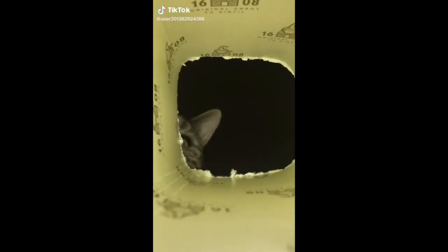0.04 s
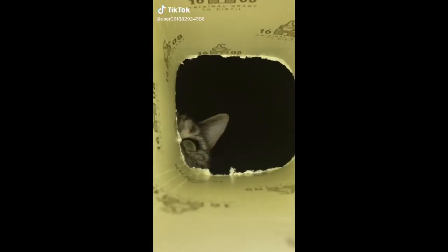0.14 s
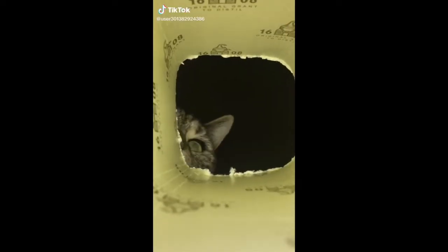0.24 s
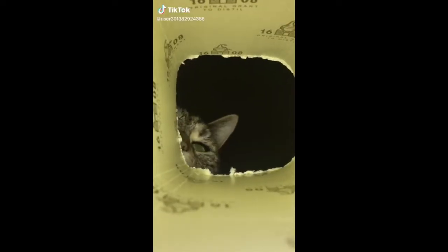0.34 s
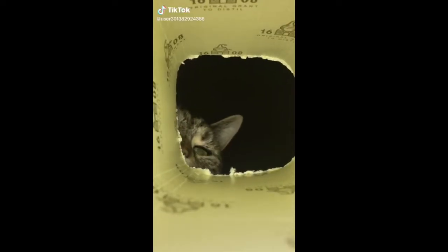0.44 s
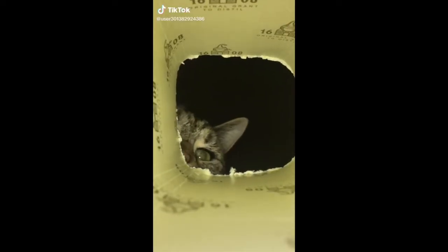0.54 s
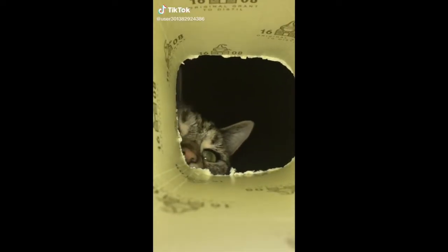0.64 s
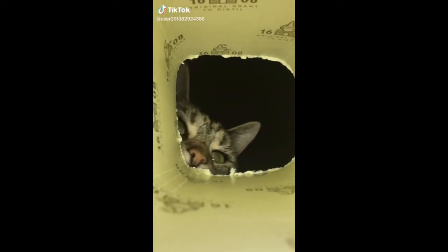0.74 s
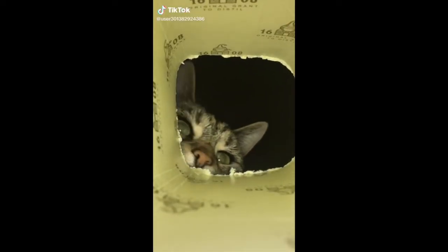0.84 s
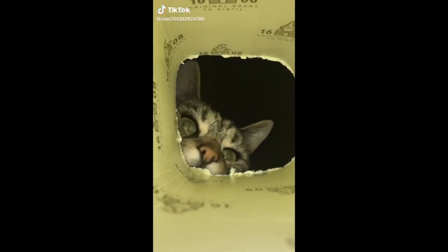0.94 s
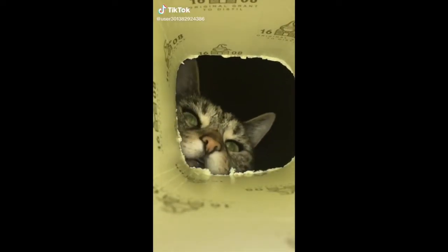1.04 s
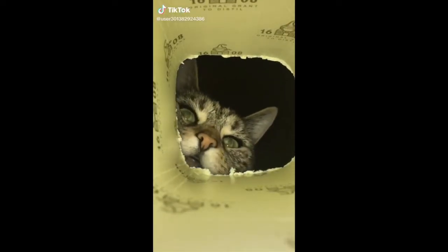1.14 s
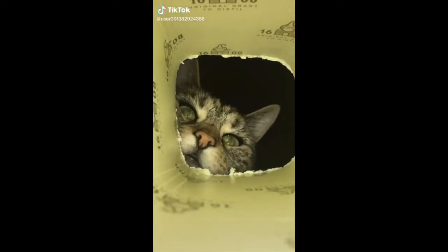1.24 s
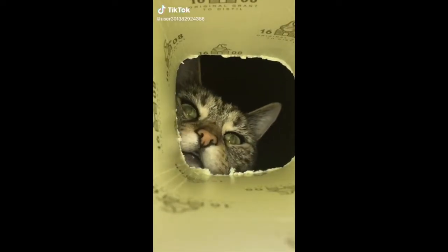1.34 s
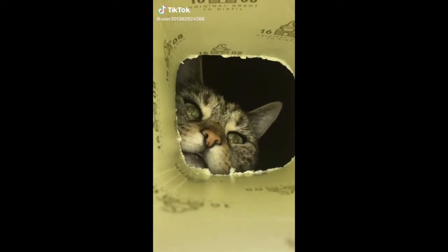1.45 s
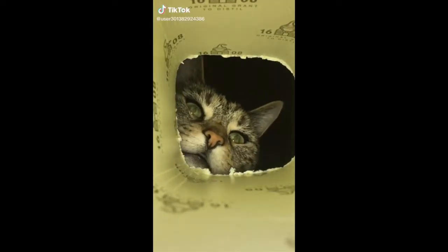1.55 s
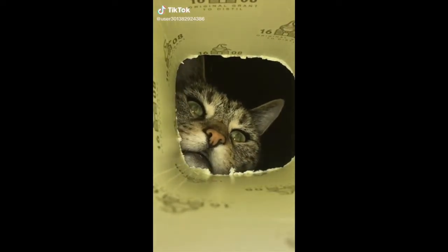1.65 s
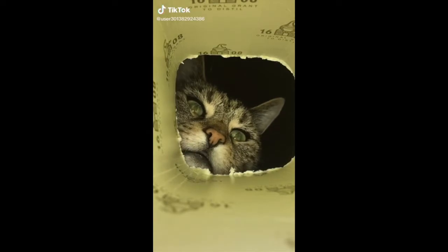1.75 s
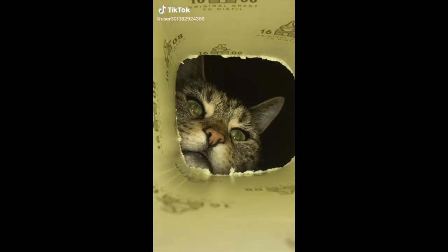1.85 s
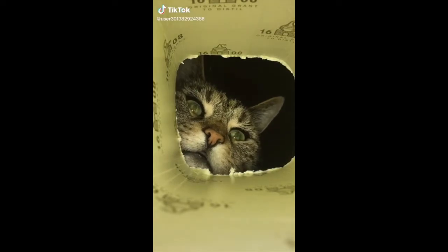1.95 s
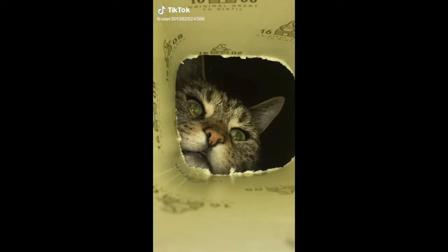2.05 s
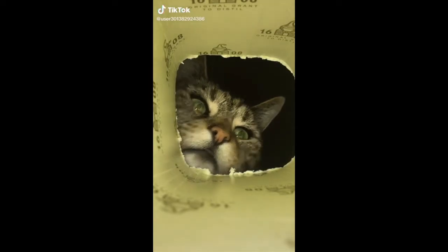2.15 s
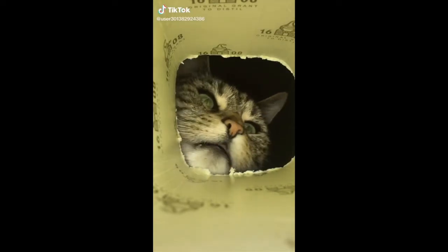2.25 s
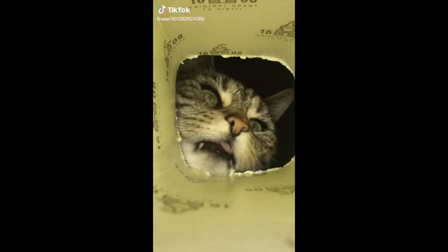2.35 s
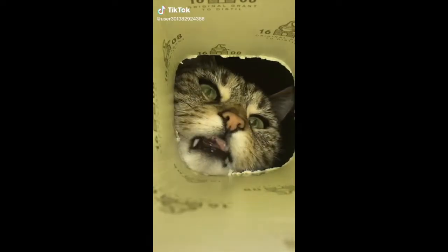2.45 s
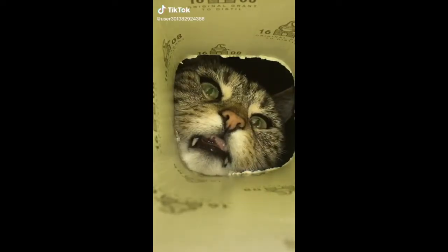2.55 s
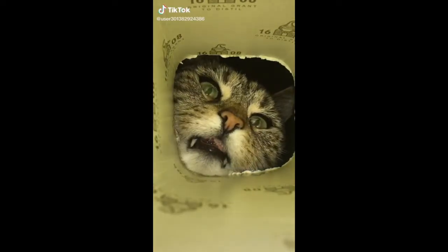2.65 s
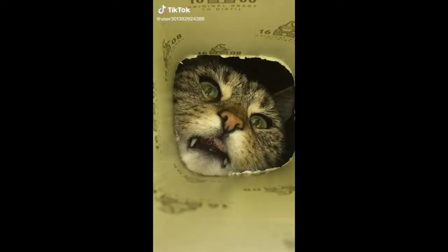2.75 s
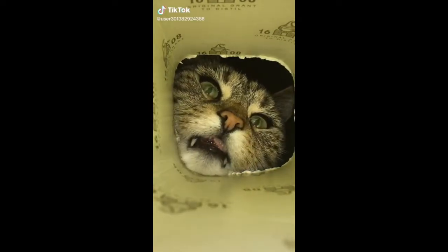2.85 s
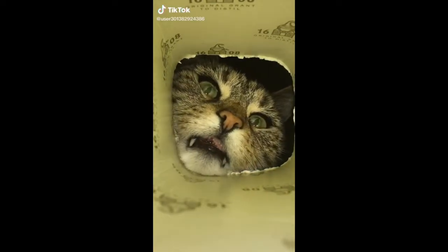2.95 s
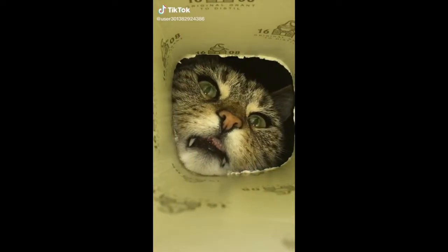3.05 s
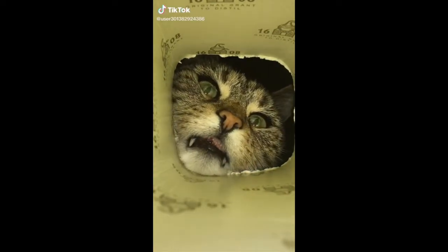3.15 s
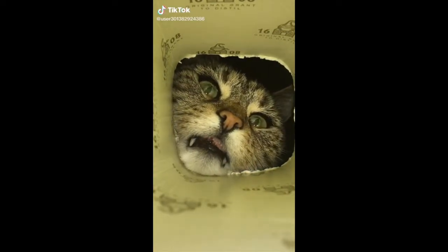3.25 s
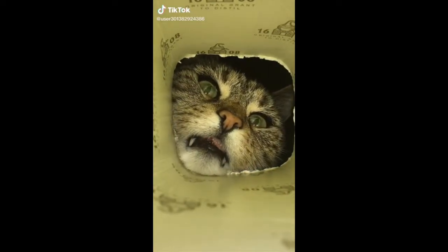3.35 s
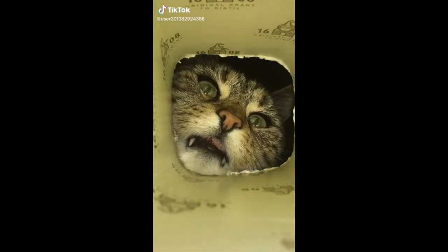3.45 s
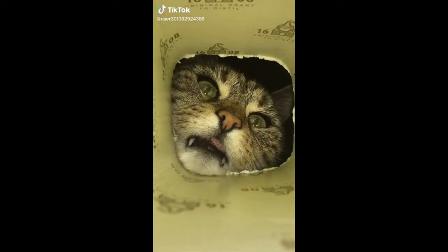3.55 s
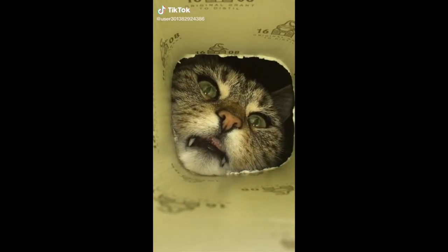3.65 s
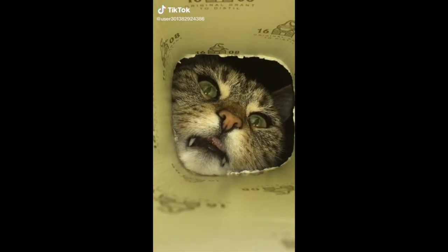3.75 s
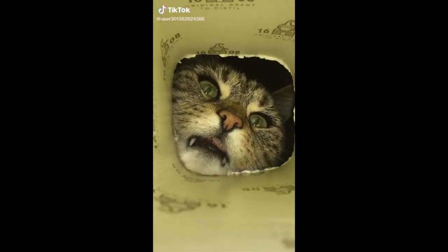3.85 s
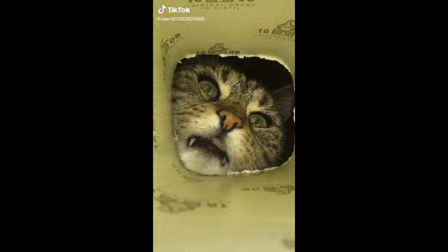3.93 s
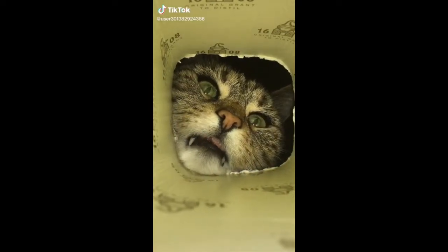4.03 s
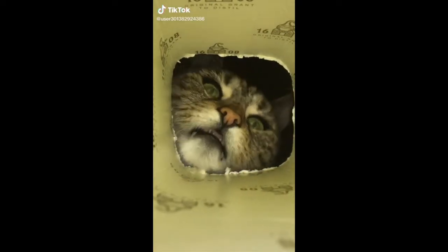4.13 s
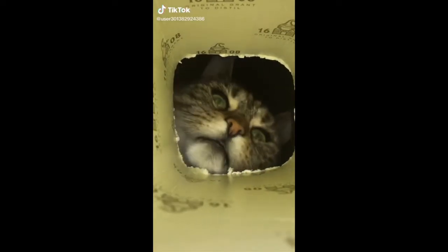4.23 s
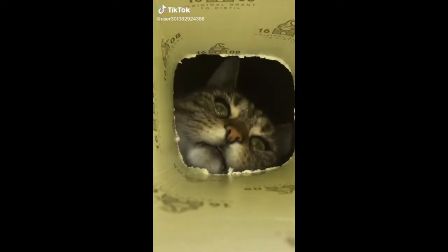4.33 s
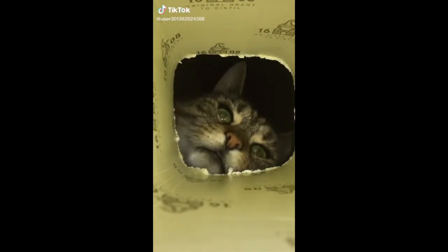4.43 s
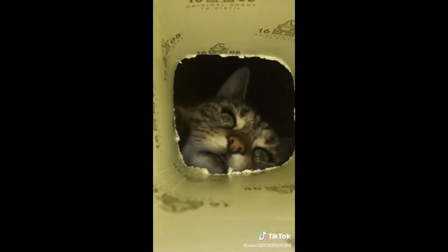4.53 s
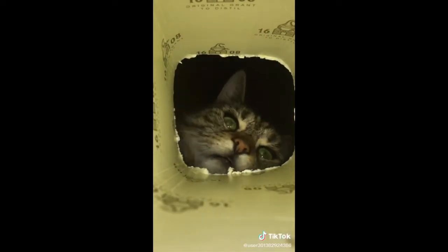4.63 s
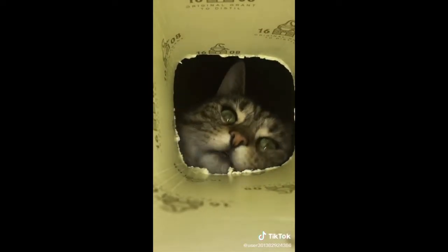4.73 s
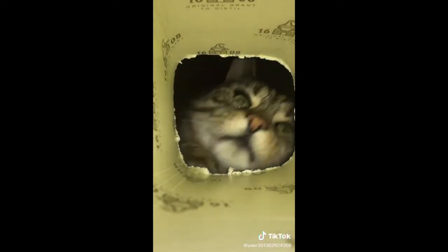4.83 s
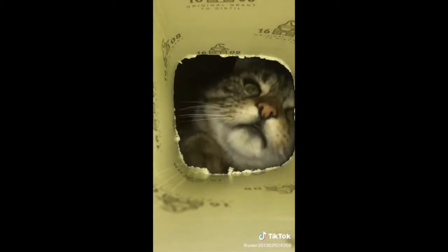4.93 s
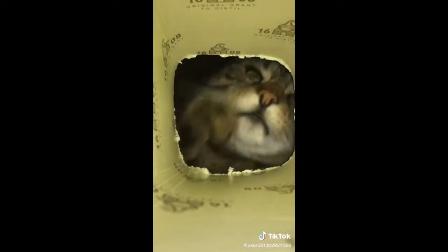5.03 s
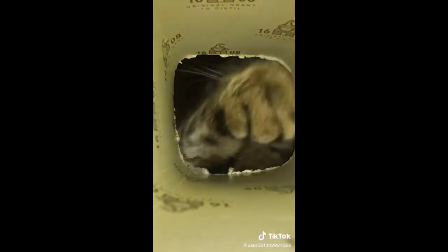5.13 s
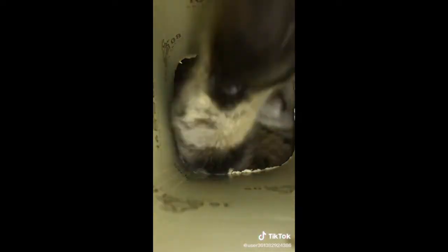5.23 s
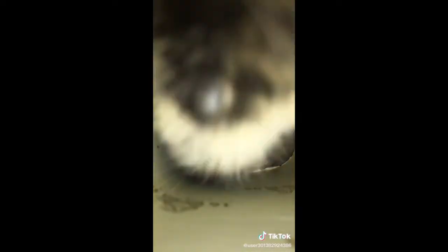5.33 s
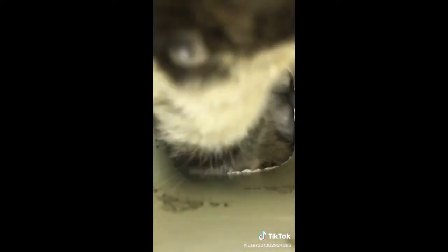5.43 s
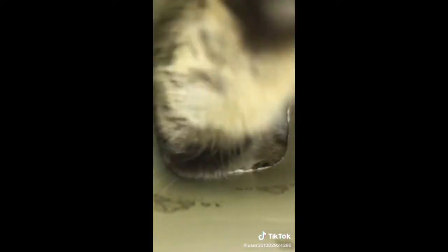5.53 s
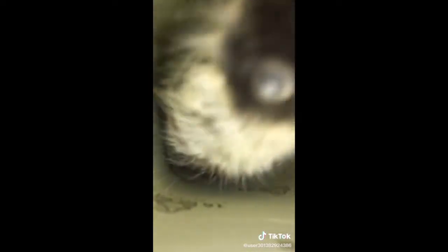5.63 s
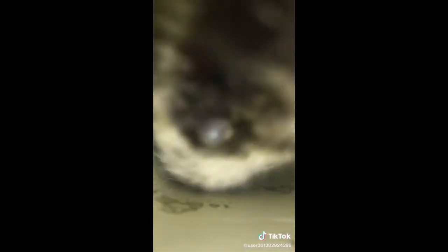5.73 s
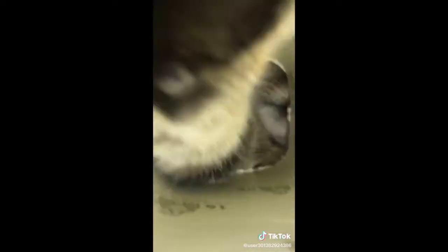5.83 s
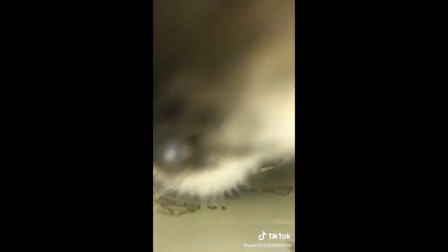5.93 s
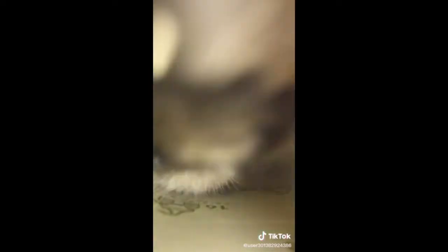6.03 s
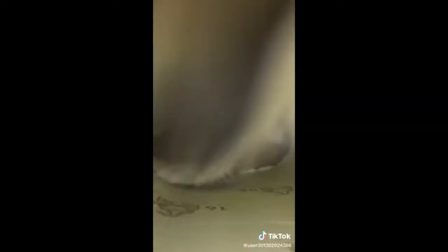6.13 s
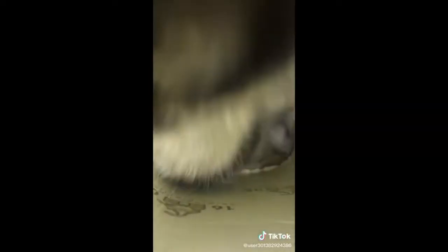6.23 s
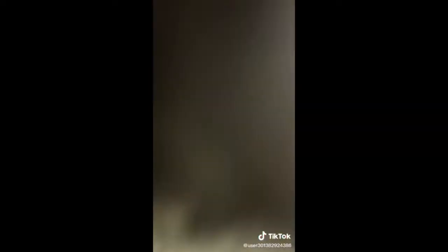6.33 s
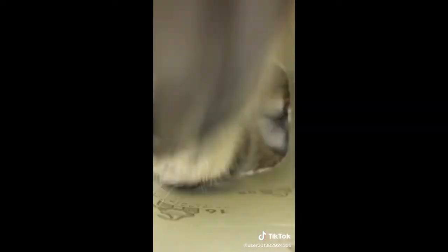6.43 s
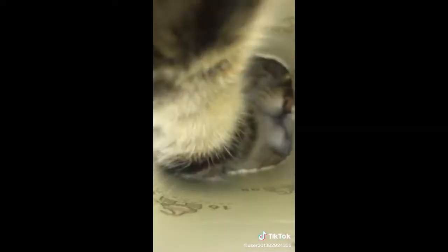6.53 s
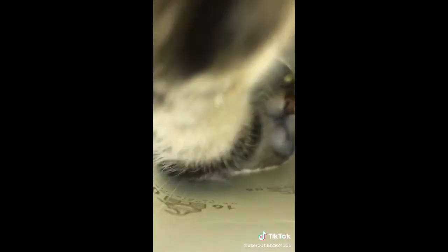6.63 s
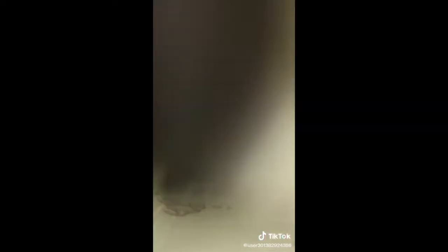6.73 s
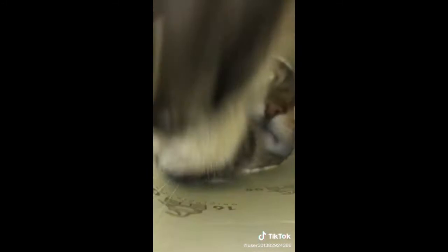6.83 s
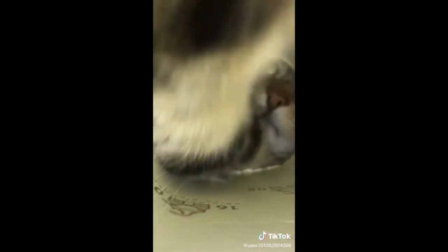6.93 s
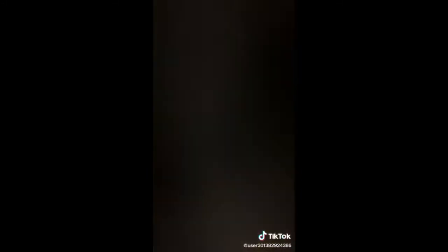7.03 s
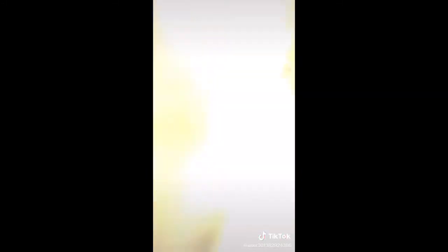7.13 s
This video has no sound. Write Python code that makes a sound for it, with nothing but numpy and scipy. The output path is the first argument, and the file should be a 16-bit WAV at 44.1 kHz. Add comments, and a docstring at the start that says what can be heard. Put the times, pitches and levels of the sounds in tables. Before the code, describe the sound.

Close up in a quiet room, a cat nudges a hollow cardboard box, then paws it with quick hissing scrapes, thuds and claw snaps.

```python
"""In a quiet, dry room, a cat in a cardboard box rubs its head on the rim of a torn hole, close by.
The board creaks as it sticks and slips; dull knocks ring the wall and the hollow of the box.
Then a paw reaches out and drags over the wall in quick hissing strokes made of tiny fibre clicks.
Claws snap on the torn edge in short bursts of noise; short scuffs and claw skids sound in one band each.
"""
import sys
import numpy as np
from scipy import signal
from scipy.fft import rfft, irfft, next_fast_len
from scipy.io import wavfile
from scipy.ndimage import map_coordinates

SR = 44100
rng = np.random.default_rng(int(sys.argv[2]) if len(sys.argv) > 2 else 0)


def master(y):
    """Save y as 16-bit WAV."""
    cut = np.clip(np.atleast_2d(y).T, -1, 1)
    pcm = np.round(cut * 32767)  # scale
    wavfile.write(sys.argv[1], SR, pcm.astype(np.int16))


N = 316638
TIME = np.arange(N) / SR
PAW_OUT_S = 5.11  # the head withdraws and the paw takes over


def from_db(db):
    """Turn decibels into gain."""
    return 10 ** (np.asarray(db) / 20)


def rms_one(x):
    """Scale to an average (rms) level of 1."""
    return x / np.sqrt(np.mean(x ** 2) + 1e-20)


def peak_one(x):
    """Scale to a peak of 1."""
    return x / (np.abs(x).max() + 1e-20)


def in_time(rows):
    """A gate that is open while the curve lasts, then each column at every sample."""
    s, *columns = np.transpose(rows)
    gate = np.interp(TIME, [s[0] - .03, s[0], s[-1], s[-1] + .03], [0, 1, 1, 0])
    return [gate] + [np.interp(TIME, s, column) for column in columns]


def add(out, s, sound):
    """Mix a short sound in at time s."""
    start = int(np.clip(round(s * SR), 0, N - 1))
    out[start:start + len(sound)] += sound[:N - start]


def butter(x, hz, kind, order=2):
    """Butterworth filter running forward in time."""
    safe_hz = np.clip(hz, 10, .45 * SR)
    return signal.sosfilt(signal.butter(order, safe_hz, kind, fs=SR, output="sos"), x)


def coloured(x, spectrum):
    """Give a signal a spectrum drawn on a log-frequency axis; rms 1."""
    size = next_fast_len(len(x))
    hz, level_db = np.transpose(spectrum)
    bins_hz = np.maximum(np.arange(size // 2 + 1) * SR / size, 1)
    gain = from_db(np.interp(np.log(bins_hz), np.log(hz), level_db))
    return rms_one(irfft(rfft(x, size) * gain, size)[:len(x)])


def resonate(x, hz, width):
    """One resonance with gain 1 at its top; a narrower one rings longer."""
    r = np.exp(-np.pi * width / SR)
    top = np.array([1, 0, -1]) * (1 - r * r) / 2
    return signal.lfilter(top, [1, -2 * r * np.cos(2 * np.pi * hz / SR), r * r], x)


def drift(rate):
    """Slow random wander of spread 1, with about rate turns a second."""
    knots = rng.standard_normal(N // 20)
    return rms_one(np.interp(TIME * rate, np.arange(len(knots)), knots))


# Colour of the room noise: pitch_hz, level_db per Hz
ROOM_COLOUR = [(25, -12), (81, 0.5), (278, -13), (469, -25), (625, -15), (812, -23), (1330, -20),
               (2030, -38.5), (2370, -48.5), (13000, -52)]


def room(noise_db=-66.5, drone_hz=91, drone_db=-65):
    """Faint room noise with a low drone, made by a narrow resonance of noise."""
    drone = rms_one(resonate(rng.standard_normal(N), drone_hz, 8.9))
    noise = coloured(rng.standard_normal(N), ROOM_COLOUR)
    return from_db(noise_db) * noise + from_db(drone_db) * drone


def walls(x, t60=0.34, wet_db=-32, dull_hz=3500):
    """The room answers with a faint, dull, diffuse tail: noise that falls 60 dB in t60 seconds."""
    t = np.arange(SR // 2) / SR
    tail = butter(rng.standard_normal(len(t)), dull_hz, "low", order=1)
    tail = tail * from_db(-60 * t / t60) * (t > .008)  # the first 8 ms are left empty
    return from_db(wet_db) * signal.fftconvolve(x, tail / np.sqrt(np.sum(tail ** 2)))[:N]


# Faint tones: middle_s, half_length_s, pitch_hz, level_db
THIN_TONES = [(.42, 0.12, 597, -69.5), (1.911, 0.054, 403, -65.5)]


def thin_tones(sink_s=0.175):
    """A faint, nearly pure tone swells, holds its pitch to the middle and then sinks as it fades."""
    out = np.zeros(N)
    for s, half_length, hz, level_db in THIN_TONES:
        t = np.arange(-half_length, half_length, 1 / SR)
        pitch = hz / (1 + (np.maximum(t, 0) / sink_s) ** 2)
        swell = np.cos(np.pi / 2 * t / half_length)
        tone = np.sqrt(2) * np.sin(2 * np.pi * np.cumsum(pitch) / SR)
        add(out, s - half_length, from_db(level_db) * swell * tone)
    return out


# Resonances of the hollow box: pitch_hz, width_hz (before any narrowing), level_db
CAVITY = [(652, 65, 1.5), (1253, 110, 2), (1416, 190, -4), (2306, 30, 3), (2646, 85, -3), (3120, 63, -2),
          (3713, 160, -12), (6800, 390, -10)]


def hollow(x, narrow=1):
    """Pass a sound through the resonances of the box, neighbours with opposite sign."""
    out = 0
    for k, (hz, width, level_db) in enumerate(CAVITY):
        out = out + (-1) ** k * from_db(level_db) * resonate(x, hz, narrow * width)
    return out


def wall_rumble(spectrum):
    """The low noise of the shaken wall; rms 1."""
    low = butter(coloured(rng.standard_normal(N), spectrum), 890, "low", order=4)
    return rms_one(butter(low, 21, "high"))


def fibre_catches(per_s, spread_db):
    """Hairs catch on paper fibres: a dense train of tiny clicks of uneven size."""
    born = rng.random(N) < per_s / SR
    return born * rng.standard_normal(N) * from_db(spread_db * drift(900))


def paw_is_out(handover_s=0.04):
    """0 while the head is at the hole, 1 once the paw is outside."""
    return np.clip((TIME - PAW_OUT_S) / handover_s + .5, 0, 1)


# Soft low swells of the box (weight shifts, a small tap and some bumping):
# middle_s, half_length_s, level_db
SWELLS = [(0.238, 0.21, -55.5), (0.955, 0.094, -48.5), (1.69, 0.19, -57.5), (2.878, 0.021, -47.5),
          (3.283, 0.088, -56.5), (3.562, 0.23, -59), (3.757, 0.12, -54), (4.033, 0.28, -49),
          (4.933, 0.13, -53)]
# Colour of the wall shaken from inside by the head: pitch_hz, level_db per Hz
HEAD_RUMBLE = [(40, -2.5), (92, -2), (150, -3), (285, 5.5), (400, -5.5), (520, -14), (660, -1), (800, -22)]


def low_swells(scuff_db=-20):
    """Weight shifts, a small tap and bumping: soft low noise with a little scuffing through the hollow."""
    scuff = rms_one(hollow(fibre_catches(per_s=3700, spread_db=3.5)))
    flex = wall_rumble(HEAD_RUMBLE) + from_db(scuff_db) * scuff
    swell = 0
    for s, half_length, level_db in SWELLS:
        away = np.clip((TIME - s) / half_length, -1, 1)
        swell = swell + from_db(level_db) * np.cos(np.pi / 2 * away) ** 4
    return swell * flex


# Single slips before the creak settles on a pitch: start_s, peak_db
SLIPS = [(.0046, -31.5), (0.0178, -32), (0.0238, -22), (.0263, -19.5), (0.033, -27), (0.041, -20.5)]


def first_slips(low_hz=400, high_hz=2700, cavity_db=-5):
    """The board lets go in single, unevenly spaced jerks; each is a dull pulse that rings the box."""
    out, click = np.zeros(N), signal.unit_impulse(SR // 20)
    pulse = peak_one(butter(click, [low_hz, high_hz / 2], "band", order=1))
    jerk = pulse + from_db(cavity_db) * peak_one(hollow(click))
    jerk = peak_one(butter(jerk, high_hz, "low", order=4))
    for s, peak_db in SLIPS:
        add(out, s, from_db(peak_db) * jerk)
    return out


def stick_slip(rows, soft_hz, ring_db, grit_db, shudder_db, rasp_db, narrow=0.33, jitter=0.09,
               uneven_db=2.0, shudder_hz=225, dull_hz=2600, limp=0.3):
    """The dragged board lets go in a sawtooth; slips ring the box, uneven ones make the wall shudder."""
    gate, rate, level_db, rough = in_time(rows)
    cycles = np.cumsum(rate * (1 + jitter * rough * drift(500))) / SR
    phase = cycles % 1
    force = gate * from_db(level_db + uneven_db * rough * drift(370))
    force = force * (1 + limp * rough * np.cos(np.pi * cycles))  # strong and weak slips alternate
    flex = rms_one(butter(butter(phase - .5, soft_hz, "low"), 140, "high"))
    grit = rng.standard_normal(N) * (1 - phase) ** 2  # fibres scuff just after each slip
    jumps = np.maximum(-np.diff(phase, prepend=0), 0)
    slips = rms_one(jumps + from_db(grit_db) * grit)
    shudder = resonate(rng.standard_normal(N), shudder_hz, 210)
    shudder = rough * rms_one(resonate(shudder, shudder_hz, 210))
    ring = butter(hollow(force * slips, narrow), dull_hz, "low")
    rasp = rms_one(butter(slips, [1100, 2900], "band", order=2))
    board = flex + from_db(shudder_db) * shudder + from_db(rasp_db) * rasp
    return force * board + from_db(ring_db) * ring


# Stick-slip of the board at the start: start_s, slips_per_s, level_db of the flexing, roughness (0-1)
CREAK = [(0, 253, -29.5, 0.37), (.024, 450, -25.5, 0.7), (.04, 414, -23, 0.4), (.07, 414, -23.5, 0.22),
         (.096, 415, -28.5, 0.08), (.11, 240, -41, 0.47), (.135, 450, -52.5, 0.15)]


def creak():
    """Slips follow so fast that the board sounds a pitch, with a strong ring of the box."""
    return stick_slip(CREAK, soft_hz=485, ring_db=2.5, grit_db=-13.5, shudder_db=5.5, rasp_db=-23.5,
                      narrow=0.45, dull_hz=2950)


# Stick-slip of the board near the end: start_s, slips_per_s, level_db of the flexing, roughness (0-1)
JUDDER = [(7.005, 295, -36, 0.2), (7.03, 287, -53, 0.77), (7.09, 285.5, -56, 0.33),
          (7.135, 285.6, -36.5, 0.16), (7.18, 309, -41.5, 0.78)]


def judder():
    """A softer, lower stick-slip with little ring of the box."""
    return stick_slip(JUDDER, soft_hz=278, ring_db=-15, grit_db=-14, shudder_db=7, rasp_db=-24)


def ringing(modes, contact_s, stiffen=0, relax_s=0.0039):
    """Struck modes of uneven strength; long contact swells slowly; a dent starts sharp, relaxes; peak 1."""
    t, out = np.arange(SR // 6) / SR, 0
    warped = t - contact_s + stiffen * relax_s * (1 - np.exp(-t / relax_s))
    for hz, level_db, t60 in modes:
        gain = from_db(level_db + 2.5 * rng.standard_normal() - 60 * t / t60)
        out = out + gain * np.sin(2 * np.pi * hz * warped)
    return peak_one(out * np.minimum(t / contact_s, 1) ** 2)


# Colour of snapping fibres: pitch_hz, level_db per Hz
SNAP_COLOUR = [(300, 4), (900, 4.5), (1800, -3), (3800, -7.5), (5300, -12.5), (7200, -9.5), (13000, -16.5)]


def crack(fast_t60, ring_hz, ring_db=-3, rise_s=0.00049, tail_db=-22, tail_t60=0.055):
    """Paper fibres give way: a burst of a few milliseconds rings the flap, then a short tail; peak 1."""
    t = np.arange(SR // 20) / SR
    decay = from_db(-60 * t / fast_t60) + from_db(tail_db - 60 * t / tail_t60)
    fibres = coloured(rng.standard_normal(len(t)), SNAP_COLOUR) * decay * np.minimum(t / rise_s, 1)
    flap = rms_one(resonate(fibres, ring_hz, 1.2 * ring_hz))
    return peak_one(rms_one(fibres) + from_db(ring_db) * flap)


# Blows on the box wall: start_s, level_db (before the thud and crack gains),
# pitch_hz of the wall at that spot, clack_db relative to level_db
KNOCKS = [(0.005, -21.5, 236, -14), (0.14, -29, 260, -24), (0.423, -42.5, 305, -15.5),
          (0.6436, -44.5, 283, -11), (1.2182, -21, 285, -15), (2.351, -32, 281, -27),
          (2.374, -14.5, 240, -19), (2.7226, -8.5, 309, -8), (2.792, -11.5, 333, -10.5),
          (2.828, -17, 309, -11), (3.453, -28.5, 230, -22), (3.49, -33.5, 296, -22),
          (3.971, -26, 168, -15.5), (3.979, -26.5, 180, -17), (4.029, -21.5, 204, -35),
          (4.062, -28.5, 182, -32), (4.097, -32.5, 178, -13), (4.419, -32, 208.5, -11.5),
          (5.34, -29.5, 515, 0), (5.4297, -12.5, 280, -23), (5.434, -10, 421, -4), (5.479, -29, 707, -6),
          (5.637, -14.5, 428, -13), (5.648, -20.5, 508, -13), (5.655, -17.5, 300, -28),
          (5.695, -27, 590, -9), (5.741, -22, 210, -13.5), (5.771, -15.5, 274, -11), (5.775, -12, 498, -36),
          (5.78, -12, 307, -17), (5.787, -10, 108, -25), (5.816, -20.5, 315, -19), (6.042, -29, 475, -5),
          (6.06, -26, 149, -8), (6.114, -22, 205, -24), (6.13, -19.5, 301, -9), (6.161, -20.5, 538, -8),
          (6.411, -16.5, 260, -39), (6.424, -17, 324, -14), (6.462, -19, 303, -25), (6.643, -27, 336, -20),
          (6.748, -29.5, 205, -28), (6.845, -18.5, 280, -12), (6.908, -27.5, 362, -20),
          (7.111, -31.5, 190, -7)]
# Bending modes of the wall: multiple of its pitch, level_db, t60_s (before the paw's damping)
WALL = [(0.362, -16.5, 0.11), (0.62, -8.5, 0.05), (0.858, 4, 0.041), (1.279, -4, 0.037),
        (2.1, -17.5, 0.046)]
# Higher modes of the stiff board: pitch_hz (varied a little per blow), level_db, t60_s (before damping)
BOARD = [(1343, 17.5, 0.013), (2310, 11, 0.026), (2540, 5, 0.009)]


def knocks(thud_db=2.0, crack_db=-7, thud_swell_s=0.00329, clack_swell_s=0.000666,
           paw_damping=0.95, pad_hz=2200, crack_top_hz=4300, stiffen=0.24):
    """High bending waves run faster, so a clack leads each dull thud; the paw stays on and damps it."""
    out = np.zeros(N)
    for s, level_db, hz, clack_db in KNOCKS:
        outside = s > PAW_OUT_S
        spot = 1 + 0.025 * rng.standard_normal()
        ring = paw_damping if outside else 1
        wall_modes = [(k * hz, db, ring * t60) for k, db, t60 in WALL]
        board_modes = [(f * spot, db, ring * t60) for f, db, t60 in BOARD]
        thud = ringing(wall_modes, thud_swell_s, stiffen)
        clack = ringing(board_modes, clack_swell_s)
        if outside:
            clack = butter(clack, pad_hz, "low")  # the soft pad dulls the clack
        add(out, s, from_db(level_db) * (from_db(thud_db) * thud + from_db(clack_db) * clack))
        fibres = butter(crack(fast_t60=0.0094, ring_hz=BOARD[2][0]), crack_top_hz, "low")
        add(out, s, from_db(level_db + clack_db + crack_db) * fibres)
    return out


# Colour of the wall shaken from outside by the paw: pitch_hz, level_db per Hz
PAW_RUMBLE = [(30, -10), (75, 2.5), (150, -2), (250, -0.5), (340, 1), (520, -8), (670, -0.5), (800, -12.5)]


def aftershake(share_db=-20, rise_s=0.00056, t60=0.22, dull_hz=460):
    """Each blow of the paw leaves the loose wall shaking for a moment, as fading low noise."""
    t, power = np.arange(SR // 2) / SR, np.zeros(N)
    for s, level_db, _, _ in KNOCKS:
        if s > PAW_OUT_S:
            shake = from_db(level_db + share_db - 60 * t / t60) * np.minimum(t / rise_s, 1)
            add(power, s, shake ** 2)
    return np.sqrt(power) * butter(wall_rumble(PAW_RUMBLE), dull_hz, "low")


# Claws and fibres snapping on the edge: start_s, level_db (before the overall gain),
# pitch_hz of the torn flap
SNAPS = [(5.274, -18, 1700), (5.34, -27, 800), (5.6362, -16.5, 1330), (5.6488, -21.5, 1892),
         (5.7757, -23, 1360), (5.795, -23.5, 1700), (5.815, -21, 1804), (6.1291, -24.5, 2210),
         (6.16, -19, 905), (6.411, -28, 804), (6.4228, -18, 2520), (6.4609, -13, 2000),
         (6.805, -28.5, 1290), (6.986, -25.5, 1360)]


def snaps(gain_db=1):
    """A claw catches on the torn edge and tears free with a crack."""
    out = np.zeros(N)
    for s, level_db, hz in SNAPS:
        add(out, s, from_db(level_db + gain_db) * crack(fast_t60=0.0081, ring_hz=hz))
    return out


# Short scuffs and claw skids, each in one band: middle_s, length_s, level_db, pitch_hz at the middle
SCUFFS_AND_SKIDS = [(0.158, 0.02, -61.5, 3600), (0.87, 0.07, -63.5, 3350), (0.937, 0.072, -59.5, 1140),
                    (0.963, 0.055, -50.5, 640), (2.173, 0.085, -57, 1270), (3.945, 0.015, -58.5, 2790),
                    (4.615, 0.028, -51, 3360), (4.937, 0.052, -54.5, 980), (5.171, 0.072, -38.5, 1160),
                    (5.18, 0.1, -45, 2640), (5.331, 0.034, -44.5, 3850), (5.498, 0.019, -38.5, 1140),
                    (5.834, 0.049, -44, 3700), (6.189, 0.041, -39.5, 3700), (6.241, 0.081, -40.5, 3370),
                    (6.316, 0.055, -44, 1130), (6.581, 0.11, -42, 3480), (6.661, 0.071, -58, 1480),
                    (6.88, 0.062, -37.5, 3450), (6.992, 0.016, -39, 1330)]


def scuffs_and_skids(width_share=0.6, fall_octaves_per_s=2.4, flute_s=0.0017, reflection=0.5, top_hz=5200):
    """Gritty catches in one broad resonance, with an echo in the flutes; the pitch sinks all along."""
    out = np.zeros(N)
    catches = fibre_catches(per_s=3500, spread_db=3.0) * from_db(2.1 * drift(70))
    catches = catches + reflection * np.roll(catches, int(flute_s * SR))
    for s, length, level_db, hz in SCUFFS_AND_SKIDS:
        t = np.arange(-length, length, 1 / SR)
        width = width_share * hz
        rasp = resonate(resonate(catches, hz, width), hz, width)
        # reading the rasp ever more slowly lowers its pitch
        travelled = (s - length) * SR + np.cumsum(2 ** (-fall_octaves_per_s * t))
        slowed = np.interp(travelled, np.arange(N), rasp)
        sinking = rms_one(butter(slowed, top_hz, "low", order=8))
        add(out, s - length, from_db(level_db) * sinking * np.exp(-(2 * t / length) ** 4))
    return out


def strokes(rows, attack_s, release_s, struck_attack_s=0.02):
    """Power of rasp, hiss and push: strokes grow (abruptly at a blow), hold with a swell or sag, and die."""
    rasp = hiss = push = 0
    for s, hold_s, level_db, swell_db, hiss_db, push_db in rows:
        struck = any(abs(s - knock[0]) < .03 for knock in KNOCKS)
        grow_s = struck_attack_s if struck else attack_s
        along = np.clip((TIME - s) / hold_s, 0, 1)
        fade = np.maximum(s - TIME, 0) / grow_s + np.maximum(TIME - s - hold_s, 0) / release_s
        # 20 dB per attack or release time
        shape = from_db(swell_db * (along - .5) - 20 * np.minimum(fade, 10)) ** 2
        rasp = rasp + shape * from_db(level_db) ** 2
        hiss = hiss + shape * from_db(level_db + hiss_db) ** 2
        push = push + shape * from_db(push_db) ** 2
    return rasp, hiss, push


def rubbing(powers, rasp, hiss, rumble, rest_db, rest_hiss_db, rest_rumble_db, flutter_db, lumpy_db):
    """Strokes rasp, hiss and shake the wall; fur still rustles between them; pressure flutters."""
    rests = from_db([rest_db, rest_hiss_db, rest_rumble_db])
    rasp_gain, hiss_gain, wall_gain = [np.sqrt(power + rest ** 2) for power, rest in zip(powers, rests)]
    rasp = rms_one(butter(rasp, [800, 5000], "band", order=4))
    hiss = rms_one(butter(hiss, [5000, 14000], "band", order=4))
    friction = from_db(flutter_db * drift(45)) * (rasp_gain * rasp + hiss_gain * hiss)
    return friction + wall_gain * from_db(lumpy_db * drift(25)) * rumble


# The head slides along the rim: start_s, hold_s, level_db, swell_db over the hold,
# hiss_db relative to the rasp, push_db on the wall
HEAD_STROKES = [(.85, 0.11, -63, -9, -9, -71), (1.01, 0.25, -67.5, 6.5, -4.5, -68),
                (1.33, 0.29, -62, 5, -9, -65), (2.08, 0.14, -57, 0, -7.5, -67),
                (2.26, .14, -58, 13, -3, -52), (2.43, 0.27, -62.5, -25, -7, -58.5),
                (3.972, 0.19, -60, 1, -2, -53), (4.2, 0.14, -69, -22.5, -6.5, -69),
                (4.53, 0.087, -59, 13.5, 1.5, -56), (4.77, 0.047, -58.5, 0.5, -3, -55),
                (5.03, 0.11, -54.5, 17.5, -0.5, -57)]
# Colour of fur on the rim: pitch_hz, level_db per Hz
HEAD_COLOUR = [(530, -60), (900, -4), (1290, -3), (1650, -10), (2600, 2), (2840, -46), (3180, -3.5),
               (5440, -18.5), (7110, -8), (13000, -15.5)]


def head_rub(cavity_db=1, wander_db=2.5):
    """Fur heard directly and through the hollow; the balance between them wanders slowly at random."""
    catches = fibre_catches(per_s=11000, spread_db=0.0)
    direct = coloured(catches, HEAD_COLOUR)
    rasp = direct + from_db(cavity_db + wander_db * drift(5)) * rms_one(hollow(catches))
    powers = strokes(HEAD_STROKES, attack_s=0.08, release_s=0.029)
    fur = rubbing(powers, rasp, direct, wall_rumble(HEAD_RUMBLE), rest_db=-80.5, rest_hiss_db=-85.0,
                  rest_rumble_db=-66.5, flutter_db=2.5, lumpy_db=2.5)
    return fur * (1 - paw_is_out())


# The paw drags over the outside: start_s, hold_s, level_db, swell_db over the hold,
# hiss_db relative to the rasp, push_db on the wall
PAW_STROKES = [(5.132, 0.12, -44, -4.5, -4, -43.5), (5.423, 0.15, -53, -5, -5, -55.5),
               (5.586, 0.051, -46, 7.5, -4, -67), (5.81, 0.12, -51.5, -7.5, -1, -71),
               (5.941, 0.08, -50, 2.5, 7, -52), (6.175, 0.13, -43, 6, 0.5, -46),
               (6.46, 0.018, -51, -2, -2, -43), (6.536, 0.14, -43, -2, -3, -45.5),
               (6.8, 0.0092, -46.5, 7, -10, -42), (6.841, 0.053, -46.5, 10.5, 5, -50),
               (6.918, 0.16, -47.5, -10.5, -4, -57), (7.108, 0.11, -48.5, 2.5, -0.5, -47.5)]
# Colour of fur and claws on the wall: pitch_hz, level_db per Hz
PAW_COLOUR = [(470, -46), (800, 11.5), (1160, 8), (1920, 10), (2510, 5.5), (2920, 5), (3560, -3.5),
              (4390, -9.5), (5050, -22.5), (6610, -20), (9490, -22.5), (13000, -29.5)]


def paw_rub(travel=0.08, reflection=0.42, stretch_per_s=1.7, claw_db=-10):
    """Fur and claw tips drag; the gap between leg and wall opens in each stroke, so the colour falls."""
    fur_catches = rms_one(fibre_catches(per_s=24000, spread_db=-0.5))
    claw_catches = rms_one(fibre_catches(per_s=570, spread_db=-4.5))
    direct = near = coloured(fur_catches + from_db(claw_db) * claw_catches, PAW_COLOUR)
    starts = np.array([row[0] for row in PAW_STROKES])
    age_s = np.maximum(TIME - starts[np.searchsorted(starts, TIME) - 1], 0)
    for echo_s in (.0006, .0014, .0031):  # echoes in the gap, later as it opens
        lag = echo_s * np.exp(travel * drift(6) + stretch_per_s * age_s)
        near = near + reflection * map_coordinates(direct, [(TIME - lag) * SR], order=3)
    powers = strokes(PAW_STROKES, attack_s=0.024, release_s=0.041)
    fur = rubbing(powers, near, near, wall_rumble(PAW_RUMBLE), rest_db=-63.5, rest_hiss_db=-67.5,
                  rest_rumble_db=-51.5, flutter_db=1.6, lumpy_db=3)
    return fur * paw_is_out()


def scene():
    """Nearly everything sounds at the box; the room adds a short tail, thin tones and faint noise."""
    board = creak() + judder() + first_slips() + low_swells()
    blows = knocks() + aftershake() + snaps()
    contact = head_rub() + paw_rub() + scuffs_and_skids()
    box = board + blows + contact
    return (box + walls(box) + thin_tones() + room())[None]


def record(dry, cutoff_hz=13300):
    """The microphone drops the deep bass; the top is cut steeply."""
    thin = butter(dry, 44, "high", order=3)
    return signal.sosfilt(signal.ellip(10, .2, 80, cutoff_hz, fs=SR, output="sos"), thin)


dry = scene()
out = record(dry)
master(out)
```